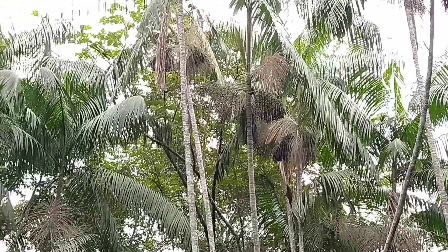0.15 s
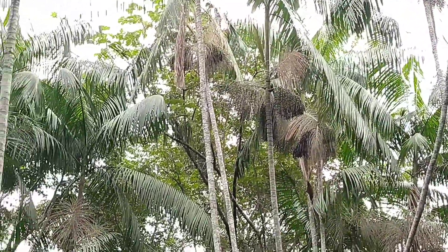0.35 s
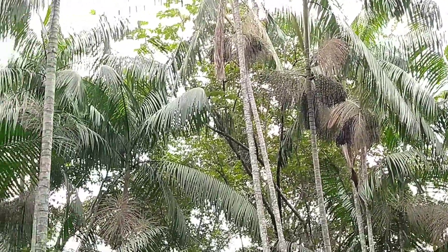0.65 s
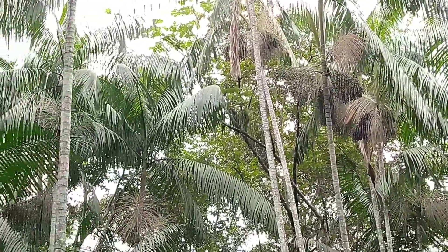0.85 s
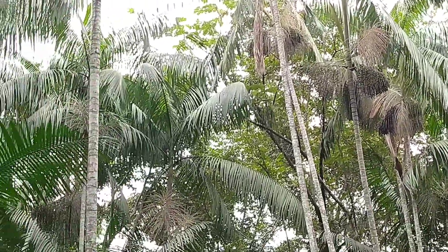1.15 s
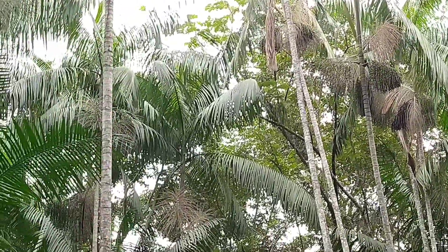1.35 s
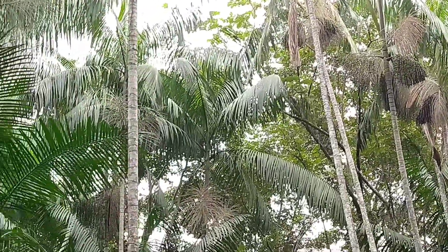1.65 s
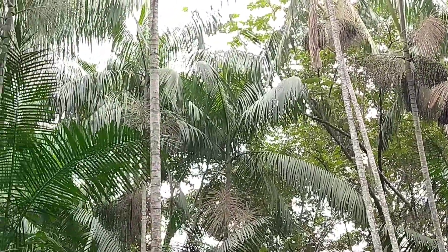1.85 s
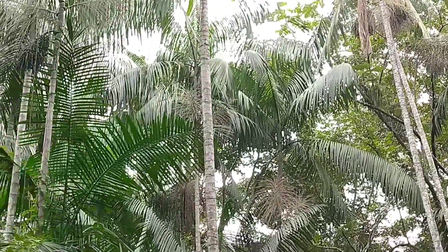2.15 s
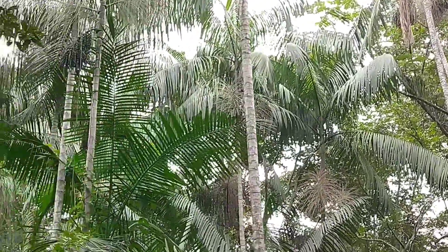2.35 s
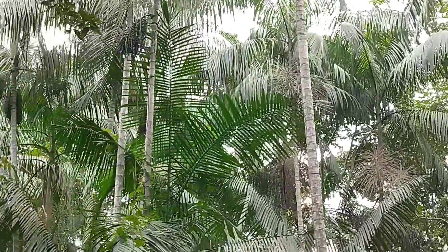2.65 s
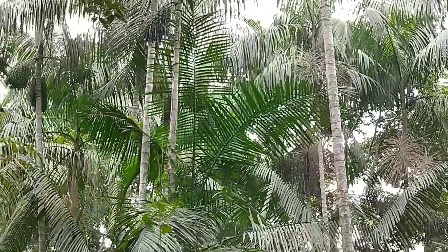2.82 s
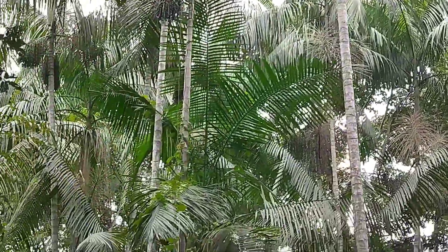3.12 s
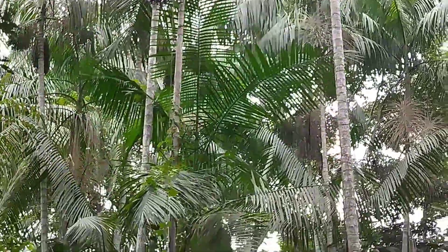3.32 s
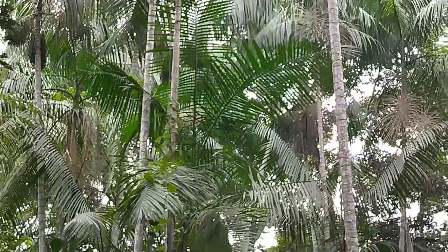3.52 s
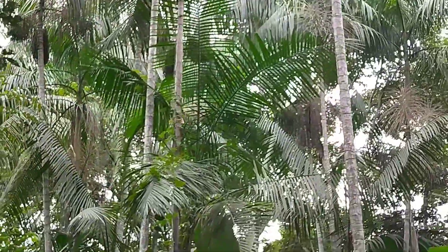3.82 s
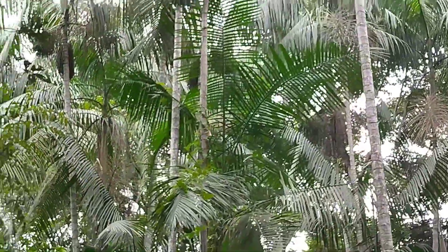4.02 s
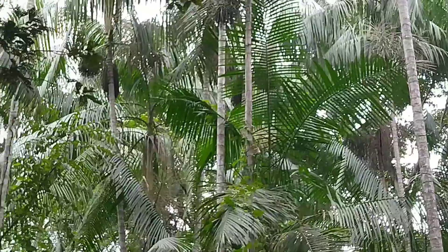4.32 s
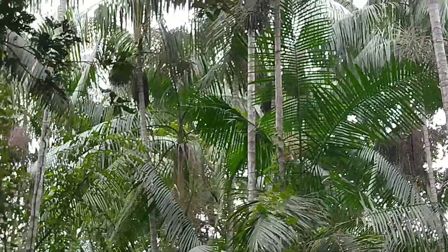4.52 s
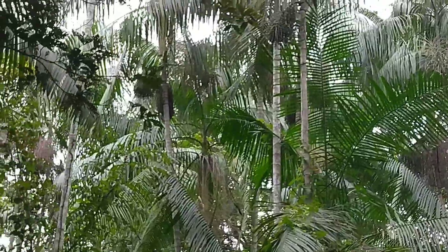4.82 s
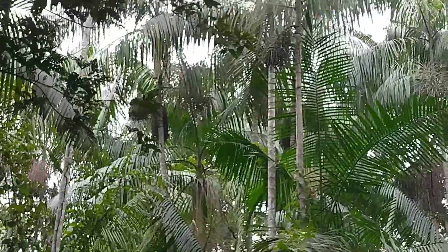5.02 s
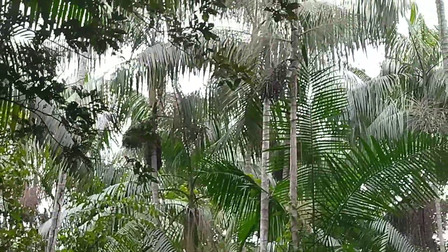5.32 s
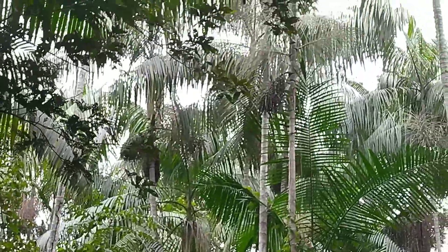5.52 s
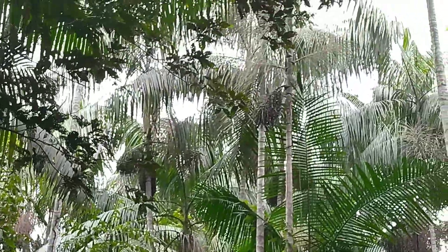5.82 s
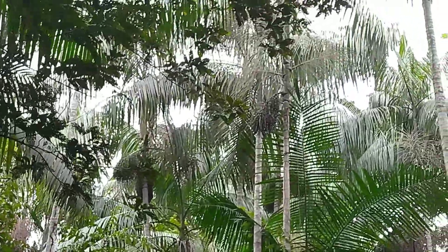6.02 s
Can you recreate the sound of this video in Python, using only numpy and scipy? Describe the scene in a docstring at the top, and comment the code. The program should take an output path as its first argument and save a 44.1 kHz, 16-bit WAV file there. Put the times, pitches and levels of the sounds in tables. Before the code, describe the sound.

Steady hissing cicadas all around with shrill surges that break off quickly; distant parrots rasp, chatter and whistle through trees over a soft low rush.

```python
"""Cicada forest with far parrots

Cicadas drone all around: a steady low choir and a high choir that swells about every two seconds, made of
random-sign clicks and hiss in bands. Far parrots squawk (rasp on a falling carrier), chatter (rasp in three
throat resonances) and whistle (gliding harmonics) through scattering trees. A soft rush of air and water,
banded noise, lies below. The two microphone ports colour the treble each in their own way."""
import sys
import numpy as np
from scipy import signal
from scipy.fft import rfft, irfft, next_fast_len
from scipy.io import wavfile

SR = 44100
rng = np.random.default_rng(int(sys.argv[2]) if len(sys.argv) > 2 else 0)


def unload_wav(signal):
    """Save mono or channel-first audio to the path in sys.argv[1] as 16-bit WAV at rate SR, clipped to [-1, 1]."""
    wavfile.write(
        sys.argv[1],
        SR,
        np.round(np.clip(np.atleast_2d(signal).T, -1, 1) * 32767).astype(np.int16),
    )


def natural_amplitude(level_db):
    """Convert a level in decibels to a linear amplitude factor, elementwise."""
    exponent = np.asarray(level_db, float) / 20
    return 10 ** exponent


N = 271656


def rms_one(x):
    """Scale to unit rms."""
    return x / np.sqrt(np.mean(x ** 2) + 1e-20)


def drift(corner_hz):
    """Slow random signal, rms 1: noise at SR / 40 through a double one-pole low-pass, interpolated."""
    pole = np.exp(-2 * np.pi * corner_hz * 40 / SR)
    noise = rng.standard_normal(N // 40 + 2002)
    slow = signal.lfilter([1], [1, -2 * pole, pole ** 2], noise)[2000:]   # skip the settling
    return np.interp(np.arange(N) / 40, np.arange(len(slow)), rms_one(slow))


def bands(x, centres_hz):
    """Yield overlapping bands, triangular in log frequency, that add up to the whole between the end centres."""
    size = next_fast_len(N)
    spectrum = rfft(x, size)
    log_hz = np.log(np.arange(size // 2 + 1) * SR / size + 1)
    for one_band in np.eye(len(centres_hz)):
        gain = np.interp(log_hz, np.log(centres_hz), one_band, 0, 0)
        yield irfft(spectrum * gain, size)[..., :N]


def choir_effort():
    """Efforts in dB of the low and high choirs; each swell of the high one climbs, then breaks off faster."""
    # effort of the low choir: t/s, effort/dB
    low_choir = [(0, -35), (.15, -37), (1.05, -34.5), (2.43, -35), (2.5, -32.5), (2.7, -34), (4.17, -34.5),
                 (4.55, -32.5), (6.16, -32)]
    # effort of the high choir without its swells: t/s, effort/dB
    high_choir = [(0, -38.5), (1.1, -37), (2.26, -35.5), (2.46, -40.5), (2.68, -34.5), (4.17, -34),
                  (4.26, -37), (4.8, -35.5), (5.27, -37.5), (5.6, -35), (6.16, -33.5)]
    # surges of the high choir: crest t/s, climb/s, rise/dB
    swells = [(1.6, 0.35, 8), (3.75, 0.29, 6.5), (6.09, 0.34, 5)]
    drop_s = 0.088
    t = np.arange(N) / SR
    low = np.interp(t, *np.transpose(low_choir))
    high = np.interp(t, *np.transpose(high_choir))
    for crest_s, climb_s, rise_db in swells:
        high = high + np.interp(t, [crest_s - climb_s, crest_s, crest_s + drop_s], [0, rise_db, 0])
    return low, high


def clicks(per_s, jitter, singers=48):
    """Buckling tymbals: each singer clicks at an uneven rate of its own, with random sign; rms 1."""
    mean_gap = SR / per_s   # samples
    count = int(N / SR * per_s * 2)
    own_gap = mean_gap * rng.uniform(0.8, 1.25, (singers, 1))
    gaps = own_gap * (1 + jitter * rng.uniform(-1, 1, (singers, count)))
    start = 2 * mean_gap * rng.random((singers, 1))
    at = (np.cumsum(gaps, axis=1) - start).astype(int).clip(0, N).ravel()
    train = np.bincount(at, rng.choice([-1, 1], at.size), N + 1)
    train[[0, N]] = 0   # clicks outside the scene were clipped to the ends
    return rms_one(train[1:])


def cicadas(flicker_db=0.93):
    """Singers on all sides reach the ports unrelated; the high choir's effort rules the top bands."""
    # drone bands: f/Hz, left gain/dB, right gain/dB (both before gain_db), share of the high choir's swell/1
    ports = [(2315, -40.5, -19.5, 1), (2500, -29.5, -24, 0.24), (2916, -13.5, -21, 0.12),
             (3270, -2.5, -6, 0.018), (3680, 1, 0, 0.059), (4010, -3, -1, 0.056), (4820, 2.5, 5, 0.14),
             (5960, -1.5, 1, 0.035), (7010, -3.5, 4.5, 0.21), (7590, -9, 1, 0.32), (8320, -10.5, 0, 0.39),
             (9120, -5, 3.5, 0.56), (10300, -1.5, -2.5, 0.67), (11040, 2.5, -5, 0.85),
             (12240, -1.5, -19, 0.62), (13100, -8, -14, 1.0), (13800, -9.5, -16, 0.9),
             (14100, -15.5, -22, 0.79), (15740, -28, -27, 0.45)]
    gain_db, hiss_db = 2.0, 5.5
    port_swell = np.array([[1], [1.04]])   # the right port faces the leaders of the swell
    hz, left_db, right_db, share = np.transpose(ports)
    low, high = choir_effort()
    swell = (high - low - np.mean(high - low)) * port_swell
    near = np.array([clicks(per_s=310, jitter=0.3), clicks(per_s=310, jitter=0.3)])
    heard = near + natural_amplitude(hiss_db) * rng.standard_normal((2, N))   # far singers blur into hiss
    out = np.zeros((2, N))
    for k, band in enumerate(bands(heard, hz)):
        flicker = flicker_db * np.array([drift(11.0), drift(9.4)])
        port_db = np.array([[left_db[k]], [right_db[k]]]) + gain_db
        out += natural_amplitude(low + share[k] * swell + flicker + port_db) * band
    return out


def rasp(pulse_hz=420, jitter=0.35, breath_db=5.0):
    """Rough voice: pulses at a wandering rate plus breath noise."""
    rate_hz = pulse_hz * (1 + jitter * drift(60).clip(-2, 2))
    pulses = np.diff(np.floor(np.cumsum(rate_hz) / SR), prepend=0)
    return rms_one(pulses) + natural_amplitude(breath_db) * rng.standard_normal(N)


def squawks():
    """Hoarse squawks: a low-passed rasp shifted onto a carrier that falls as the beak closes."""
    # squawks: start t/s, length/s, level/dB
    squawk_list = [(-.04, 0.13, -52.5), (0.101, 0.097, -52.5), (0.264, .13, -55.5), (0.415, 0.09, -54),
                   (0.503, 0.075, -54), (0.621, 0.16, -52.5), (0.801, 0.098, -52), (0.888, 0.12, -50.5),
                   (1.01, .19, -50.5), (1.187, 0.18, -52.5), (1.382, 0.14, -51), (1.58, 0.19, -52),
                   (4.6, 0.073, -48.5), (4.938, 0.095, -53)]
    open_hz, shut_hz, width_hz = 2551, 1719, 1200   # resonance, beak open and shut
    lowpass = signal.butter(4, width_hz / 2, fs=SR, output="sos")
    rough = rms_one(signal.sosfilt(lowpass, rasp()))
    t, out = np.arange(N) / SR, np.zeros(N)
    for start_s, length_s, level_db in squawk_list:
        u = ((t - start_s) / length_s).clip(0, 1)
        carrier_hz = open_hz + (shut_hz - open_hz) * u
        carrier = np.sqrt(2) * np.sin(2 * np.pi * np.cumsum(carrier_hz) / SR)
        out += natural_amplitude(level_db) * np.sin(np.pi * u) ** 0.71 * rough * carrier
    return out


def resonance(x, hz, width_hz):
    """Two-pole band-pass with peak gain about 1."""
    r = np.exp(-np.pi * width_hz / SR)
    numerator = [(1 - r * r) / 2, 0, (r * r - 1) / 2]
    return signal.lfilter(numerator, [1, -2 * r * np.cos(2 * np.pi * hz / SR), r * r], x)


def twice(x, hz, width_hz):
    """A resonance applied twice keeps the valleys dark; rms 1."""
    return rms_one(resonance(resonance(x, hz, width_hz), hz, width_hz))


def chatter(flutter_db=4.5):
    """Several birds at once: one rasp in three throat resonances that flutter independently."""
    # throat resonances: f/Hz, width/Hz, base gain/dB
    throat = [(1560, 560, -1.5), (2200, 480, 6), (2936, 260, 9)]
    # bouts: start t/s, length to the release/s, level/dB, low and top resonance gains re middle/dB (added to base)
    bouts = [(2.095, 0.38, -75.5, 8, 0), (2.44, .26, -65, -1, 8), (3.946, 0.07, -71, 10, 0),
             (4.11, 0.26, -72.5, -2, 0), (4.437, 0.44, -62, -4, -3), (4.903, .4, -62, 0, -5)]
    attack_s, release_s = 0.066, 0.13
    t, voice = np.arange(N) / SR, rasp()
    low, middle, top = [natural_amplitude(base_db + flutter_db * drift(14.5)) * twice(voice, hz, width_hz)
                        for hz, width_hz, base_db in throat]
    out = np.zeros(N)
    for start_s, length_s, level_db, low_db, top_db in bouts:
        end_s = start_s + length_s
        fade = np.interp(t, [start_s, start_s + attack_s, end_s, end_s + release_s], [0, 1, 1, 0])
        out += fade * natural_amplitude(level_db) * (natural_amplitude(low_db) * low + middle + natural_amplitude(top_db) * top)
    return out


def notes():
    """Short gliding whistles of three harmonics, coloured by the beak, under a rounded envelope."""
    # single notes: start t/s, pitch/Hz, glide/Hz, level before colour/dB
    single_notes = [(.155, 1590, -15, -66), (.35, 1520, -15, -66), (.468, 1490, 55, -58),
                    (.558, 1566, -10, -55.5), (1.312, 1505, -42, -61), (1.49, 1440, -10, -57),
                    (2.435, 1470, -47, -54), (2.452, 1110, 35, -47.5), (2.482, 1420, -32, -57),
                    (2.51, 1148, 15, -48), (2.538, 1590, -14, -50.5), (2.64, 1090, -8, -55),
                    (2.68, 1090, -19, -51), (4.47, 1420, 53, -65), (4.52, 1120, -23, -57),
                    (5.165, 1177, -44, -55), (5.205, 1103, 13, -51), (5.258, 1015, -25, -45)]
    # five-note phrase: t after its start/s, pitch/Hz, glide/Hz, level before colour/dB
    phrase = [(0, 1024, -47, -49.5), (.03, 1445, -23, -51.5), (.088, 1760, -260, -45), (.13, 1175, 5, -46),
              (.166, 1108, -68, -48.5)]
    # phrase starts: t/s
    phrase_starts_s = [4.56, 4.893]
    # gain of a harmonic by its frequency: f/Hz, gain/dB
    note_colour = [(1000, -21.5), (1180, -11), (1450, -3), (2300, 1), (2900, 7), (4500, -8)]
    note_s = 0.0355
    colour_hz, colour_db = np.transpose(note_colour)
    out, waver = np.zeros(N), 0.01 * drift(60)
    u = np.linspace(0, 1, round(note_s * SR))
    envelope = np.sqrt(np.sin(np.pi * u).clip(0))
    phrased = [(start_s + after_s, *rest) for start_s in phrase_starts_s for after_s, *rest in phrase]
    for start_s, hz, glide_hz, level_db in single_notes + phrased:
        at = round(start_s * SR)
        span = slice(at, at + len(u))
        pitch_hz = (hz + glide_hz * u) * (1 + waver[span])
        phase = 2 * np.pi * (np.cumsum(pitch_hz) / SR + rng.random())
        tone = 0
        for k in (1, 2, 3):
            gain_db = np.interp(np.log(k * pitch_hz), np.log(colour_hz), colour_db)
            tone = tone + natural_amplitude(gain_db) * np.sin(k * phase)
        out[span] += np.sqrt(2) * natural_amplitude(level_db) * envelope * tone
    return out


def through_trees(x, scatter_db, left_lag_s):
    """Direct sound reaches the right port first; trunks scatter a dying noise tail, another on each side."""
    t60_s, tail_start_s = 0.25, 0.004
    t = np.arange(SR // 2) / SR
    tails = rng.standard_normal((2, len(t))) * natural_amplitude(-60 * t / t60_s) * (t > tail_start_s)
    tails = natural_amplitude(scatter_db) * tails / np.sqrt(np.sum(tails ** 2, axis=1, keepdims=True))
    late = np.interp(np.arange(N) - left_lag_s * SR, np.arange(N), x)
    return np.array([late, x]) + signal.fftconvolve(x[None], tails, axes=1)[:, :N]


def rush(level_db=-58.5, flicker_db=0.84):
    """Air and water: smooth low noise, partly shared by the ports, all bands flickering together."""
    # spectrum shape: f/Hz, relative gain/dB
    spectrum = [(12, -30), (20, 9), (32, -8), (76, -8), (171, -15.5), (212, -13), (259, -12), (401, -17.5),
                (540, -14), (646, -18), (1290, -16.5), (2300, -13), (2990, -44), (5060, -120)]
    # left-right likeness: f/Hz, correlation/1
    likeness = [(60, 0.21), (180, 0.23), (550, 0.59), (1650, 0.05), (4970, 0.087), (15000, -0.01)]
    hz, gain_db = np.transpose(spectrum)
    like_hz, like = np.transpose(likeness)
    alike = np.interp(np.log(hz), np.log(like_hz), like).clip(-1, 1)
    flicker = flicker_db * drift(16)
    out = np.zeros((2, N))
    for k, (mid, side) in enumerate(bands(rng.standard_normal((2, N)), hz)):
        pair = np.sqrt(1 + alike[k]) * mid + np.sqrt(1 - alike[k]) * side * [[1], [-1]]
        out += natural_amplitude(gain_db[k] + flicker) * pair
    return natural_amplitude(level_db) * rms_one(out)


def scene():
    """Cicadas near, parrots far, the rush below."""
    far_birds = through_trees(squawks() + chatter(), scatter_db=-1.5, left_lag_s=0.00035)
    nearer_bird = through_trees(notes(), scatter_db=-6, left_lag_s=0.0008)
    return cicadas() + far_birds + nearer_bird + rush()


def roll_off(x):
    """The treble ends steeply here."""
    return signal.sosfilt(signal.butter(12, 15750, fs=SR, output="sos"), x)


def record(dry):
    """Pass the finished mix on to the output stage."""
    return roll_off(dry)


dry = scene()
out = record(dry)
unload_wav(out)
```